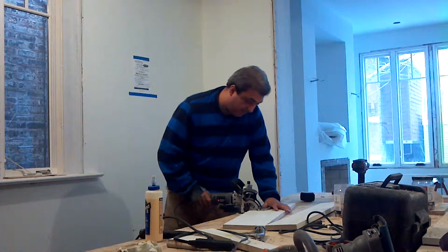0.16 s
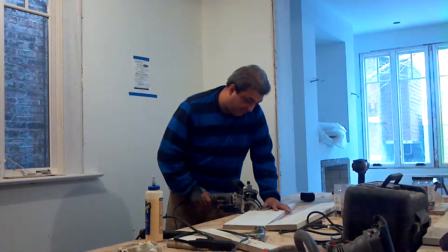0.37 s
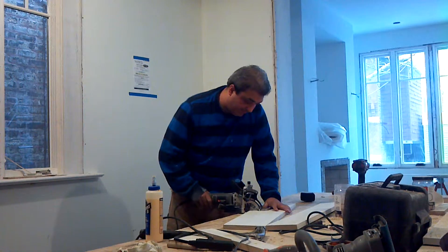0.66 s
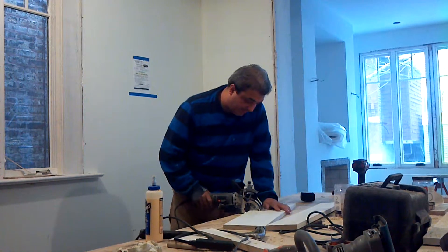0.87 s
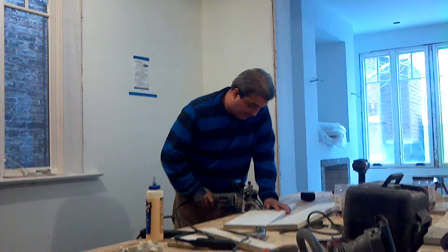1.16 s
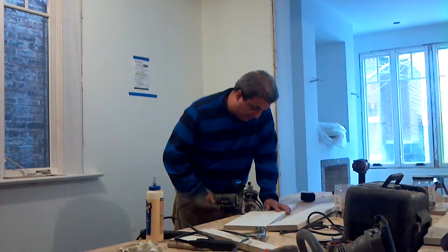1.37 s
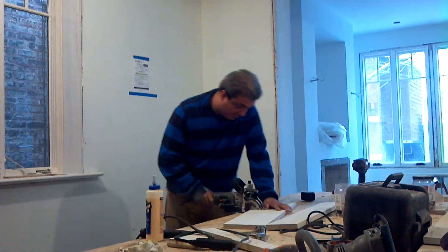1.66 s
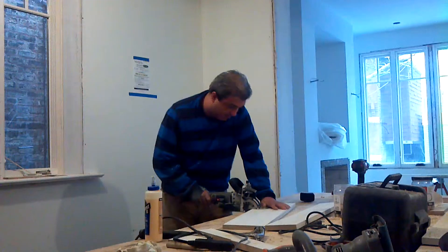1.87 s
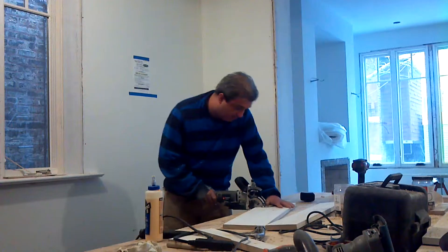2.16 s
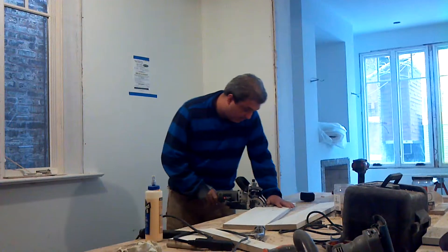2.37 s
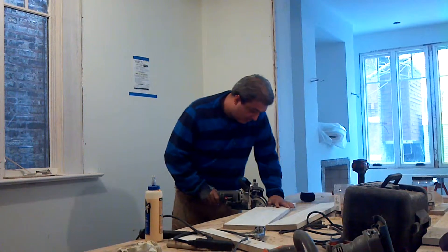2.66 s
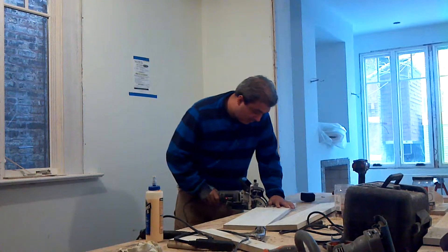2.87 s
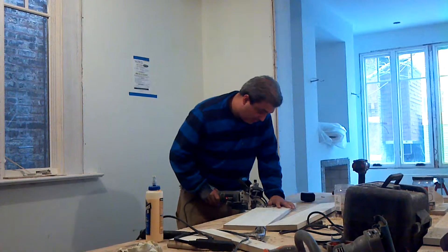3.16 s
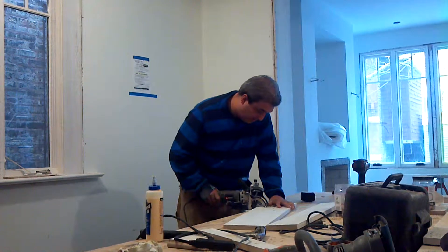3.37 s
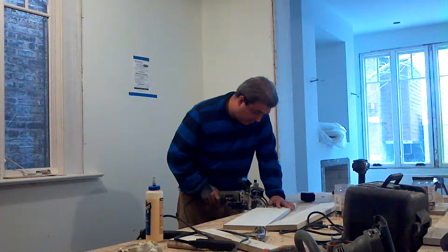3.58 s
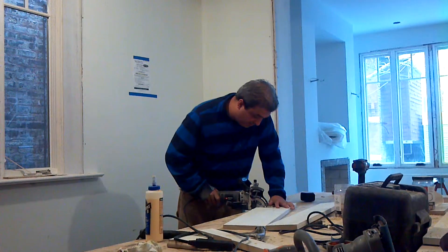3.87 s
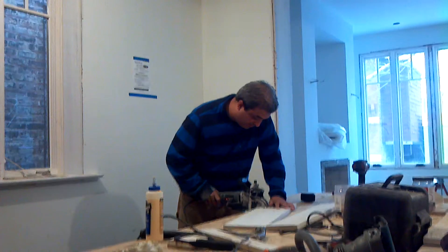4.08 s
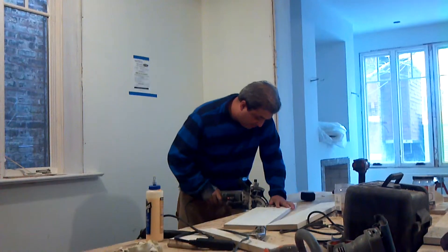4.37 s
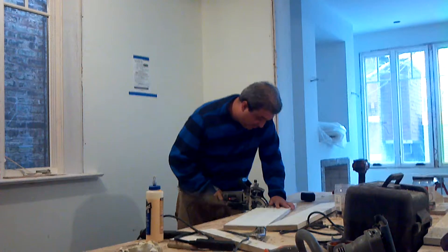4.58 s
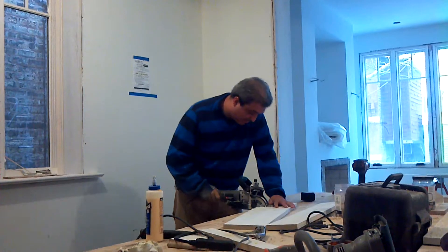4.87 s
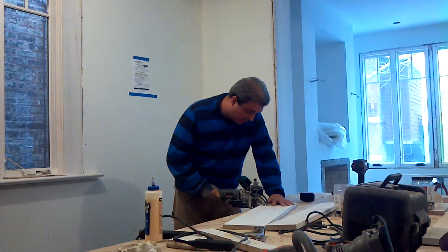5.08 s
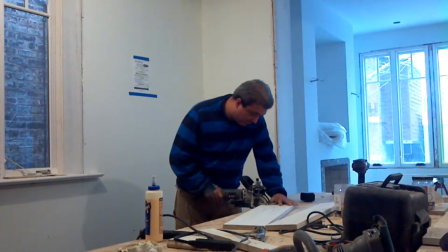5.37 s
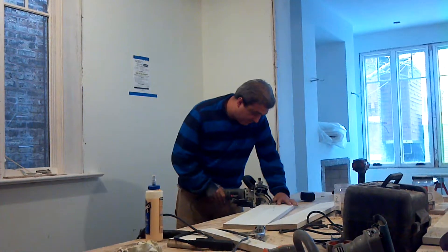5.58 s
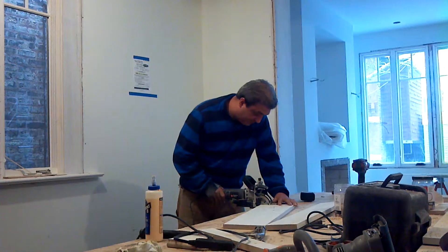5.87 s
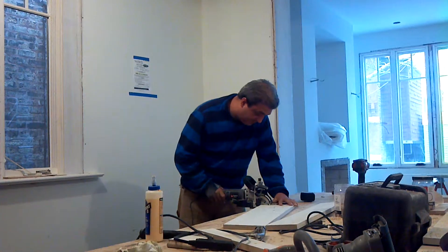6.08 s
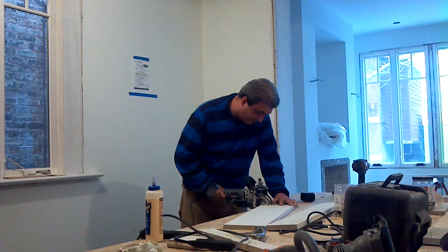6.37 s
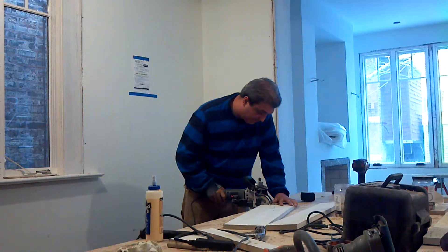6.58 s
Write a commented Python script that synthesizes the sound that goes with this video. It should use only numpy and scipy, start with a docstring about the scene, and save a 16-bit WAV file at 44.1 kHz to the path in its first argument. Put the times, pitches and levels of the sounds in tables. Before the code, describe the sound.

A power joiner rattles and whines down, then twice clacks on, surges to speed and rasps into wood before coasting down in a bare room.

```python
"""A biscuit joiner cuts two slots in a board in a bare plastered room.
It is first heard coasting down: random tooth impacts make the slack gears rattle, gliding lines make
the falling whine and the spinning blade rings in split modes.
Each pull of the trigger kicks the motor up to speed: filtered tooth noise makes the rush and the bite,
grabbing teeth growl and screech, mains hum surges, and noise bursts make the clacks of the mechanism."""
import sys
import numpy as np
from scipy import signal
from scipy.fft import rfft, irfft, next_fast_len
from scipy.io import wavfile

SR = 44100
rng = np.random.default_rng(int(sys.argv[2]) if len(sys.argv) > 2 else 0)


def waveform_to_disk(signal):
    """Save audio, clipped to [-1, 1], as 16-bit WAV at the path in sys.argv[1]."""
    frames = np.transpose(np.atleast_2d(signal))
    scaled = np.clip(frames, -1, 1) * 32767
    samples = np.round(scaled).astype(np.int16)
    wavfile.write(sys.argv[1], SR, samples)


N = 296352

# pulls of the trigger, the first one already over:
# start_s, top_speed (turns per s), speed_leaving_wood (turns per s)
PULLS = [(-1.845, 615, 466), (1.045, 615, 466), (4.331, 545, 428)]
# how hard the slack gears shake the tool, before the trims in gears():
# speed (turns per s), rattle_db, housing_db, bench_db
SHAKE_BY_SPEED = [(68.5, -29.5, -38, -47), (85.5, -31, -32, -36.5), (113, -27, -35, -44),
                  (135, -27.5, -34.5, -42), (169, -25, -34, -43.5), (188, -25, -37, -39.5),
                  (253, -25.5, -31.5, -39.5), (303, -26.5, -39, -42.5), (345, -25.5, -29.5, -39.5)]
# plunges into the wood: start_s, fan_rush_db, bite_db, bite_delay_s, bite_half_length_s (2 dB down),
# housing_jolt_db (before the trim in gears()), current_surge_s
PLUNGES = [(1.05, -20.5, -22.5, 0.22, 0.075, -21.5, 0.12), (4.328, -21.5, -21, 0.27, 0.097, -22.5, .08)]
# starting kicks, fence returns and gear slaps:
# start_s, level_db (before dulling), decay_t60_s, dull_above_hz, housing_ring_db (relative to the knock)
KNOCKS = [(.689, -31, 0.063, 5000, 1), (0.709, -26, 0.055, 11900, -5), (1.046, -5, 0.013, 11900, 3),
          (1.053, -14, 0.071, 10100, 0), (1.104, -22, 0.083, 4000, 7), (1.123, -19, 0.044, 3000, 4),
          (1.762, -15, 0.25, 3480, -7), (1.829, -19, 0.12, 500, -10), (3.028, -23, 0.025, 9000, -16),
          (3.227, -25, 0.067, 6000, -2), (3.249, -28, 0.093, 4000, 5), (3.304, -33.5, 0.12, 6000, 9.5),
          (3.628, -21.5, 0.076, 3000, -6), (3.735, -21, 0.069, 9000, -14), (3.945, -34, .04, 3500, -13),
          (4.022, -33, 0.042, 3500, -18), (4.331, -8.5, 0.098, 5000, -24), (4.337, -10, 0.27, 5000, -7),
          (4.981, -9, 0.036, 2540, -2.5), (4.99, -11.5, 0.2, 2000, -7), (5.064, -12, 0.12, 500, -11),
          (6.124, -21.5, 0.064, 9000, -15), (6.24, -12.5, 0.3, 300, -15), (6.262, -18, 0.096, 7000, -13),
          (6.32, -17, 0.029, 7000, -16), (6.56, -26.5, 0.17, 9000, -24)]
# the teeth grab the wood: centre_s, half_length_s (standard deviation),
# growl_db (at the rotor speed), octave_db, screech_db, board_drone_db
GRABS = [(1.236, 0.023, -31, -29, -19, -33.5), (1.32, 0.034, -28, -44, -24.5, -38.5),
         (1.534, 0.12, -50, -44, -33, -38), (4.528, 0.038, -24.5, -27.5, -21, -39),
         (4.717, 0.086, -39, -31.5, -26.5, -41)]

# colour of the gear rattle: pitch_hz, relative level_db
RATTLE_COLOUR = [(85, -33), (300, -6.5), (700, -12), (1400, 3), (1850, 2.5), (2550, 10.5), (3400, 4),
                 (4400, 4.5), (5200, 6.5), (6400, 4.5), (7300, 0.5), (9700, 0.5), (13000, -1), (15500, -40)]
# colour of the rush and the bite: pitch_hz, relative level_db
CUT_COLOUR = [(90, -38.5), (180, -19.5), (400, -3.5), (800, -1.5), (1500, -6), (2500, -9), (3900, 1),
              (5200, -5.5), (6800, -3.5), (8200, -1.5), (9500, -5), (12500, -10.5), (15500, -19.5)]
# colour of the cracks: pitch_hz, relative level_db
KNOCK_COLOUR = [(80, -31.5), (250, 0), (700, -8), (1100, 1.5), (2300, 17), (4200, 5), (6000, 7), (8300, 1),
                (12000, 7.5), (15500, -21)]
# resonance of the bench: pitch_hz, relative level_db
BENCH_COLOUR = [(30, -36), (85, -8.5), (130, -8), (200, -3.5), (330, 4), (430, -0.5), (540, 7), (720, 5),
                (1000, -10), (2500, -48.5)]
# resonances of the tool that the whine slides through: pitch_hz, gain_db
WHINE_COLOUR = [(110, -20), (210, -3), (330, -4), (560, -1), (750, -8), (930, -3), (1100, 6), (1280, -4),
                (1620, 0), (1900, -4), (2250, 6), (2600, 5), (3200, -9), (3800, -6), (4300, -1), (4800, 0),
                (6000, -7), (7500, -7), (9300, -1), (10500, -8), (13000, -15)]

# housing resonances: pitch_hz, width_hz, relative level_db
HOUSING = [(894, 64, 7), (1057, 91, 8.5), (1195, 96, 6)]
# motor tones (12 and 24 gear mesh, 6.35 and 12.7 cutting teeth, the rest bearings), before WHINE_COLOUR:
# multiple of the speed, fast_coasting_db, slow_coasting_db, cutting_db, width_hz
MOTOR_TONES = [(1.76, -23, -29, -30, 14), (3.55, -11, -28, -34, 140), (5.15, -11, -28, -32, 150),
               (6.35, -30, -23, -18, 22), (6.8, -24, -16.5, -24, 20), (12, -18, -27.5, -40, 15),
               (12.7, -45, -25, -20, 40), (24, -15, -45, -24, 22)]
# the unbalanced rotor sings as it coasts, before BENCH_COLOUR:
# multiple of the speed, level_db (relative to the rattle), waver_hz
ROTOR_TONES = [(1, -30.5, 4.2), (2, -35, 5.67)]
# blade modes, relative to the rattle: pitch_hz, fixed_line_db (before a 1 dB lift),
# rising_wave_db, falling_wave_db, split (Hz per turn/s)
BLADE_MODES = [(6530, -21, -26, -18, .95), (8020, -19, -18, -34, .45), (8150, -20, -24, -32, 1.15),
               (8720, -20, -34, -36, 1.4), (10605, -20, -13, -28, 1.75), (12641, -22, -26, -30, 1.7)]
# gear case rung by the slaps: pitch_hz, width_hz, level_db (relative to the rattle)
GEAR_CASE = [(1107, 113, -19), (1633, 130, -17), (2314, 300, -14.5), (4300, 230, -15.5), (6500, 340, -18.5)]
# metal parts that ring in each knock: pitch_hz, width_hz, level_db (relative to the knock)
METAL = [(502, 27, -20), (1470, 410, -6), (4360, 250, -7), (7160, 100, -16)]
# screech of the cutting teeth: multiple of the speed, relative level_db, width_hz
SCREECH = [(2.9, -8, 130), (4.3, -4, 110), (6.35, -1.5, 45), (7.0, -7, 170), (8.2, -7, 250),
           (12.4, -4.5, 320), (13.7, -6, 300)]

# stereo balance: pitch_hz, left_minus_right_db
BALANCE = [(60, -12), (120, 7), (250, 1.8), (550, 0), (1000, -0.5), (1900, -5.5), (3000, -1.5),
           (4500, -1.5), (8000, -2.5), (13000, -1.5)]
# sound that the two microphones do not share: pitch_hz, gain_db
UNSHARED = [(100, 14.5), (250, -1.5), (600, -3.5), (1200, -13), (2800, -34.5), (5500, -21), (14000, -7.5)]
# echo from the far side of the room: pitch_hz, level_db (relative to the tool's side)
FAR_SIDE = [(1100, -3.5), (2000, -5.5), (4800, -4.5), (6500, -9), (13000, -8)]

# the motor spins up, is dragged down by the wood, then coasts against air drag and bearing friction
SPIN_UP_S, CUT_END_S, DRAG_PER_S, FRICTION_TURNS_PER_S2 = 0.19, 0.56, 0.476, 38
# gear rattle, its slaps and the rotor tones
TURN_LIKENESS, FLUTTER_DB, FLUTTER_PER_S = 0.087, 3.2, 140
SLAPS_PER_S, SLAP_SPREAD_DB, ROTOR_FLICKER_DB = 70, 2.5, 2
# envelopes of the plunge; hold times count from its start
RUSH_ATTACK_S, RUSH_HOLD_S, RUSH_RELEASE_DB_PER_S = 0.0058, 0.45, 37
JOLT_HOLD_S, JOLT_RELEASE_DB_PER_S = 0.2, 166
# relative to the cutting, before the trims in gears()
HOUSING_IN_CUT_DB, BENCH_IN_CUT_DB = -27, -13
# the blade runs slightly out of true
RASP_DEPTH, ROTOR_TURNS_PER_BLADE_TURN = 0.1, 3.2
# mains hum: a surge of starting current, then steady while the trigger is held
SURGE_DB, SURGE_ATTACK_S, SURGE_RELEASE_DB_PER_S = -30, 0.062, 104
RUNNING_HUM_DB, TRIGGER_HELD_S, HUM_RELEASE_DB_PER_S = -44, 0.73, 140
GROWL_WIDTH_HZ, BOARD_HZ, BOARD_WIDTH_HZ = 8.78, 327, 13.4
# room and pickup
ROOM_T60_S, TREBLE_T60_S = 0.23, 0.35
PORT_LAG_S, IN_PHASE_HZ = 1 / 2760, 1380
LOW_CUT_HZ, CUTOFF_HZ = 103, 15700


def from_db(db):
    """Decibels to gain."""
    return 10 ** (np.asarray(db) / 20)


def rms_one(x):
    """Scale to unit power."""
    return x / np.sqrt(np.mean(x ** 2) + 1e-20)


def power_sum(*levels_db):
    """Level of unrelated sounds heard together."""
    return 10 * np.log10(sum(from_db(db) ** 2 for db in levels_db))


def gain_at(points, hz):
    """Gain of a dB spectrum at the given frequencies."""
    known_hz, db = np.transpose(points)
    return from_db(np.interp(np.log(hz + 1), np.log(known_hz), db))


def coloured(x, points):
    """Causal (minimum-phase) filter with the given spectrum; white noise keeps its power."""
    gain = rms_one(gain_at(points, np.fft.rfftfreq(2 * N, 1 / SR)))
    # folding the cepstrum onto positive time gives minimum phase
    cepstrum = irfft(np.log(gain))[:N]
    cepstrum[1:] *= 2
    return irfft(rfft(x, 2 * N) * np.exp(rfft(cepstrum, 2 * N)))[:N]


def drift(rate):
    """Smooth chance with spread 1, changing at about the given rate in Hz."""
    step = 16  # samples between the interpolated points
    size = 2 * next_fast_len(N // step // 2 + 2, True)
    hz = np.fft.rfftfreq(size, step / SR)
    smoothed = rfft(rng.standard_normal(size)) / (1 + (hz / rate) ** 2)
    slow = rms_one(irfft(smoothed))
    ramps = np.diff(slow)[:, None] * np.arange(step) / step
    return (slow[:-1, None] + ramps).ravel()[:N]


def rough_tone(hz, width):
    """A moving line whose strength and phase wander, which gives it a width."""
    phase = 2 * np.pi * np.cumsum(hz) / SR
    return drift(width) * np.cos(phase) + drift(width) * np.sin(phase)


def clean_tone(hz, width):
    """A moving line of steady strength whose pitch wavers by the given width."""
    wavering_hz = hz + 0.5 * width * drift(18.7)
    return np.sqrt(2) * np.sin(2 * np.pi * np.cumsum(wavering_hz) / SR)


def resonate(x, hz, width):
    """Two-pole resonance; its width sets how fast the ring dies."""
    r = np.exp(-np.pi * width / SR)
    return signal.lfilter([1, 0, -1], [1, -2 * r * np.cos(2 * np.pi * hz / SR), r * r], x)


def swell_db(start, attack, hold, release_db_per_s):
    """Envelope in dB: rises over the attack, stays until the hold time, then fades."""
    age = np.arange(N) / SR - start
    rise_db = 20 * np.log10(np.clip(age / attack, 1e-5, 1))
    return rise_db - release_db_per_s * np.maximum(age - hold, 0)


def motor_speed():
    """Turns per second: each pull spins the motor up, the cut slows it, then it coasts."""
    t, speed = np.arange(N) / SR, np.zeros(N)
    friction = FRICTION_TURNS_PER_S2 / DRAG_PER_S
    for start, top, leaving in PULLS:
        age = t - start
        before = speed[max(int(start * SR), 0)]
        rising = before + (top - before) * np.sin(np.pi / 2 * age / SPIN_UP_S)
        loaded = np.interp(age, [SPIN_UP_S, CUT_END_S], [top, leaving])
        coasting = (leaving + friction) * np.exp(-DRAG_PER_S * (age - CUT_END_S)) - friction
        stages = [age < 0, age < SPIN_UP_S, age < CUT_END_S]
        speed = np.select(stages, [speed, rising, loaded], coasting)
    return speed


def shaking(speed):
    """Levels of the rattle, the housing and the bench that go with the speed."""
    known_speed, *levels_db = np.transpose(sorted(SHAKE_BY_SPEED))
    return [np.interp(speed, known_speed, db) for db in levels_db]


def tooth_impacts(speed, spread_db, rub_db, lurch_db):
    """Gear teeth touch twelve times a turn, each with a force of its own, over a hiss of rubbing."""
    uneven_rate = 12 * speed * (1 + 0.08 * drift(150))
    teeth = np.floor(np.cumsum(uneven_rate) / SR)
    touch = np.diff(teeth, prepend=0) > 0
    force = from_db(spread_db * np.minimum(rng.exponential(1, N), 4)) * rng.choice([-1, 1], N)
    # dividing by the root of the speed evens out the power of more frequent touches
    impacts = rms_one(touch * force / np.sqrt(speed))
    impacts = impacts + from_db(rub_db) * rng.standard_normal(N)
    return rms_one(impacts * from_db(lurch_db * drift(5.0)))


def flutter(x):
    """Each band of the rattle flutters in level on its own."""
    edges_hz = [1500, 2200, 3300, 5000, 8000]
    lows = [signal.sosfiltfilt(signal.butter(2, hz, fs=SR, output="sos"), x) for hz in edges_hz]
    bands = np.diff([np.zeros(N), *lows, x], axis=0)
    return rms_one(sum(band * from_db(FLUTTER_DB * drift(FLUTTER_PER_S)) for band in bands))


def gears(speed, rattle_db, housing_db, bench_db):
    """The gear rattle partly repeats every turn; it sounds directly, through the housing and the bench."""
    impacts = tooth_impacts(speed, spread_db=2.5, rub_db=-5.5, lurch_db=1.69)
    turn_ago = np.maximum(np.arange(N) - SR / speed, 0).astype(int)
    impacts = rms_one(impacts + TURN_LIKENESS * impacts[turn_ago])
    rattle = flutter(coloured(impacts, RATTLE_COLOUR))
    housing = 0
    for k, (hz, width, db) in enumerate(HOUSING):
        # neighbouring resonances have opposite sign
        housing = housing + from_db(db) * rms_one(resonate(impacts, hz, width)) * (-1) ** k
    bench = coloured(impacts, BENCH_COLOUR)
    out = from_db(rattle_db - 2.0) * rattle
    out = out + from_db(housing_db - 4.0) * rms_one(housing)
    return out + from_db(bench_db - 4.5) * bench


def whine(speed, rattle_db, cut_db):
    """Bearing, gear and cutting tones swell as they slide through the resonances of the tool."""
    # at low speed the unloaded teeth bounce, which smears the mesh tone
    slack = 1 / (1 + (speed / 250) ** 6)
    # the tones of the cut come in only once the blade is up to speed
    rattle, load = from_db(rattle_db), from_db(cut_db) * (1 - slack)
    out = np.zeros(N)
    for k, fast_db, slow_db, loaded_db, width in MOTOR_TONES:
        coasting = (1 - slack) * from_db(fast_db) + slack * from_db(slow_db)
        strength = coasting * rattle + from_db(loaded_db) * load
        out += strength * gain_at(WHINE_COLOUR, k * speed) * rough_tone(k * speed, width)
    mesh_hz = 12 * speed
    mesh_gain = gain_at(WHINE_COLOUR, mesh_hz)
    smear = slack * mesh_gain * rough_tone(mesh_hz, 190)
    # at high speed the teeth stay in contact and sing one thin tone
    thin = (1 - slack) ** 2 * mesh_gain * clean_tone(mesh_hz, 10)
    return out + rattle * (from_db(-11.5) * smear + from_db(-13.5) * thin)


def rotor(speed, rattle_db):
    """The unbalanced rotor's low tones flicker, follow the speed and swell where the bench resonates."""
    tones = 0
    for k, db, waver in ROTOR_TONES:
        strength = from_db(db + ROTOR_FLICKER_DB * drift(6.7))
        tones = tones + strength * gain_at(BENCH_COLOUR, k * speed) * clean_tone(k * speed, waver)
    return from_db(rattle_db) * tones


def blade(speed, rattle_db):
    """The steel disc rings; spin splits each mode into a forward and a backward wave."""
    out = np.zeros(N)
    for hz, fixed_db, up_db, down_db, split in BLADE_MODES:
        out += from_db(fixed_db + 1) * rough_tone(np.full(N, hz), 14)
        out += from_db(up_db) * rough_tone(hz + split * speed, 47)
        out += from_db(down_db) * rough_tone(hz - split * speed, 28)
    return from_db(rattle_db) * out


def slaps(rattle_db):
    """Random hard slaps across the gear play ring the gear case, each with its own colour."""
    hits = rng.random(N) < SLAPS_PER_S / SR
    out = 0
    for hz, width, db in GEAR_CASE:
        force = hits * from_db(SLAP_SPREAD_DB * np.clip(rng.standard_normal(N), -2, 2))
        # the inaudible noise keeps the filter from running on exact silence
        force = force + 1e-18 * rng.standard_normal(N)
        out = out + from_db(db) * rms_one(resonate(force, hz, width))
    return from_db(rattle_db) * out


def knocks():
    """Each knock is a decaying noise crack that rings housing and metal; softer contacts are duller."""
    t = np.arange(SR // 2) / SR
    cracks, shoves = np.full((2, N + SR), 1e-18)
    for start, db, t60, dull_hz, ring_db in KNOCKS:
        at, r = int(start * SR), np.exp(-2 * np.pi * dull_hz / SR)
        burst = rng.standard_normal(len(t)) * from_db(db - 60 * t / t60)
        crack = signal.lfilter([1 - r], [1, -r], burst)
        cracks[at:at + len(t)] += crack
        shoves[at:at + len(t)] += from_db(ring_db) * crack
    cracks, shoves = cracks[:N], shoves[:N]
    housing = rms_one(sum(resonate(shoves, hz, width) for hz, width, _ in HOUSING)) * np.std(shoves)
    metal = sum(from_db(db) * rms_one(resonate(cracks, hz, width)) for hz, width, db in METAL)
    return coloured(cracks, KNOCK_COLOUR) + housing + metal * np.std(cracks)


def effort():
    """Levels of cutting, jolt and hum: a plunge starts with a surge, and the blade bites soon after."""
    t, cut, jolt, current = np.arange(N) / SR, [], [], []
    for start, rush_db, bite_db, delay, length, jolt_db, surge_s in PLUNGES:
        cut.append(rush_db + swell_db(start, RUSH_ATTACK_S, RUSH_HOLD_S, RUSH_RELEASE_DB_PER_S))
        cut.append(bite_db - 2 * ((t - start - delay) / length) ** 2)
        jolt.append(jolt_db + swell_db(start, RUSH_ATTACK_S, JOLT_HOLD_S, JOLT_RELEASE_DB_PER_S))
        surge = swell_db(start, SURGE_ATTACK_S, surge_s, SURGE_RELEASE_DB_PER_S)
        running = swell_db(start, SURGE_ATTACK_S, TRIGGER_HELD_S, HUM_RELEASE_DB_PER_S)
        current += [SURGE_DB + surge, RUNNING_HUM_DB + running]
    return power_sum(*cut), power_sum(*jolt), power_sum(*current)


def cutting(speed, cut_db):
    """The blade tears off a dense spray of chips in the rush of the fan, rasping once per blade turn."""
    chips = tooth_impacts(speed, spread_db=3.0, rub_db=-2.5, lurch_db=0.6)
    rasp = 1 + RASP_DEPTH * rough_tone(speed / ROTOR_TURNS_PER_BLADE_TURN, 32)
    return from_db(cut_db) * coloured(rms_one(chips * rasp), CUT_COLOUR)


def hum(hum_db):
    """Motor current shakes the tool at twice the mains frequency, wavering slightly in level."""
    tone = np.sqrt(2) * np.sin(2 * np.pi * 120 * np.arange(N) / SR)
    return from_db(hum_db) * tone * from_db(0.62 * drift(6.0))


def grabs(speed):
    """When the teeth grab, the loaded rotor growls, the cut screeches and the board drones."""
    t, out = np.arange(N) / SR, np.zeros(N)
    growl = clean_tone(speed, GROWL_WIDTH_HZ)
    octave = clean_tone(2 * speed, 2 * GROWL_WIDTH_HZ)
    screech = rms_one(sum(from_db(db) * rough_tone(k * speed, width) for k, db, width in SCREECH))
    board = clean_tone(np.full(N, BOARD_HZ), BOARD_WIDTH_HZ)
    for centre, length, growl_db, octave_db, screech_db, board_db in GRABS:
        sound = from_db(growl_db) * growl + from_db(octave_db) * octave
        sound = sound + from_db(screech_db) * screech + from_db(board_db) * board
        out += sound * np.exp(-0.5 * ((t - centre) / length) ** 2)
    return out


def room(x):
    """Diffuse echo of the bare room with its own treble decay; its pattern shifts as the worker moves."""
    t = np.arange(SR // 2) / SR
    noise = rng.standard_normal((2, len(t))) * (t > 0.004)
    low = signal.sosfilt(signal.butter(1, 3000, fs=SR, output="sos"), noise)
    tails = low * from_db(-60 * t / ROOM_T60_S) + (noise - low) * from_db(-60 * t / TREBLE_T60_S)
    one, other = signal.oaconvolve(x[None], tails / np.linalg.norm(tails[0]), axes=1)[:, :N]
    sway = 2 * drift(1)  # radians of slow blend between the two tails
    return one * np.cos(sway) + other * np.sin(sway)


def microphones(near, far, diffuse):
    """Treble from the tool's side reaches the right channel late, from the far side early."""
    hz = np.fft.rfftfreq(2 * N, 1 / SR)
    lag = np.exp(-2j * np.pi * np.maximum(hz - IN_PHASE_HZ, 0) * PORT_LAG_S)
    near, far, diffuse = rfft([near, far, diffuse], 2 * N)
    echo = gain_at(FAR_SIDE, hz)
    # share the power between the two sides
    near, far = near / np.hypot(1, echo), far * echo / np.hypot(1, echo)
    apart = diffuse * gain_at(UNSHARED, hz)
    lean = np.sqrt(gain_at(BALANCE, hz))
    left = (near + far + apart) * lean
    right = ((near - apart) * lag + far / lag) / lean
    return irfft([left, right])[:, :N]


def scene():
    """The tool on its bench, heard across the room."""
    speed = motor_speed()
    rattle_db, housing_db, bench_db = shaking(speed)
    cut_db, jolt_db, hum_db = effort()
    housing_db = power_sum(housing_db, jolt_db, cut_db + HOUSING_IN_CUT_DB)
    bench_db = power_sum(bench_db, cut_db + BENCH_IN_CUT_DB)
    tool = gears(speed, rattle_db, housing_db, bench_db) + whine(speed, rattle_db, cut_db)
    tool = tool + rotor(speed, rattle_db) + blade(speed, rattle_db) + slaps(rattle_db)
    tool = tool + knocks() + cutting(speed, cut_db) + grabs(speed)
    near = tool + from_db(-10.5) * room(tool)
    heard = microphones(near, far=room(tool), diffuse=room(tool))
    # the hum stands in the room, strong on the left and opposed on the right
    return heard + hum(hum_db) * np.array([[1], [-0.3]])


def record(dry):
    """The bass and the top are cut over a faint noise floor, and the highest peaks clip."""
    thin = signal.sosfilt(signal.butter(6, LOW_CUT_HZ, "high", fs=SR, output="sos"), dry)
    # white noise at -76 dB through a low-pass that tilts it to the bass
    floor = from_db(-76) * signal.lfilter([0.1], [1, -0.995], rng.standard_normal((2, N)))
    top_cut = signal.ellip(10, 0.2, 70, CUTOFF_HZ, fs=SR, output="sos")
    return signal.sosfilt(top_cut, np.clip(thin + floor, -1, 1))


dry = scene()
out = record(dry)
waveform_to_disk(out)
```